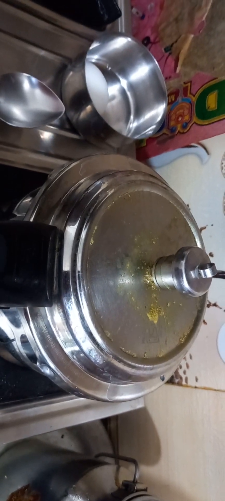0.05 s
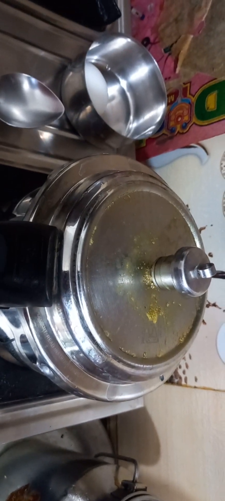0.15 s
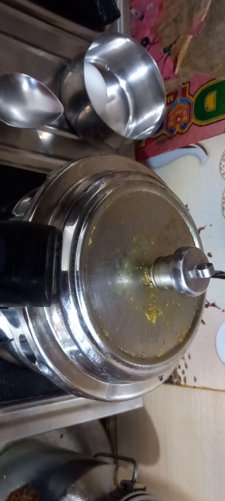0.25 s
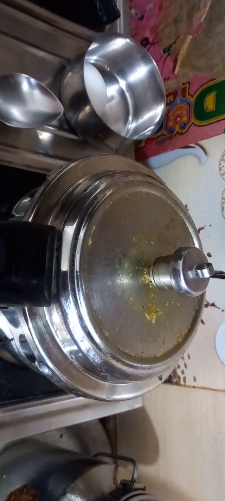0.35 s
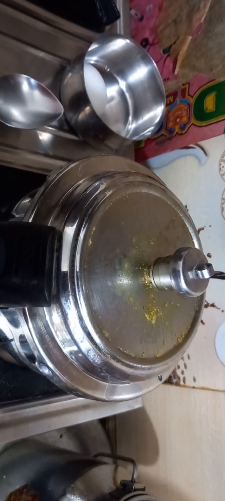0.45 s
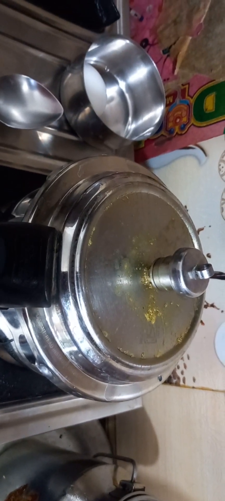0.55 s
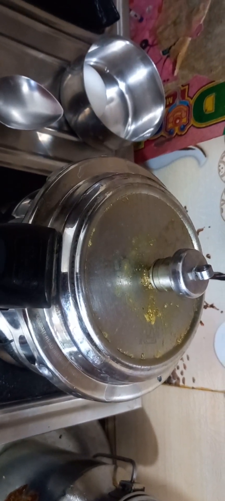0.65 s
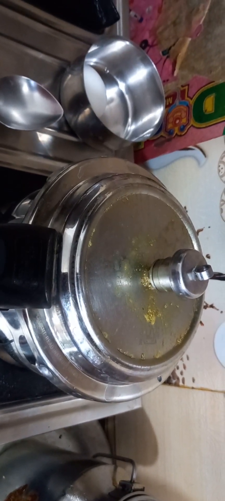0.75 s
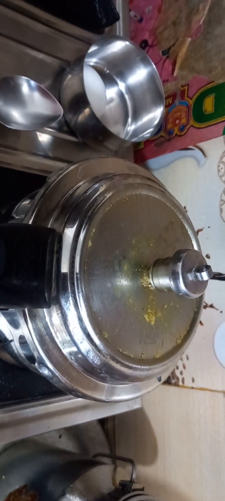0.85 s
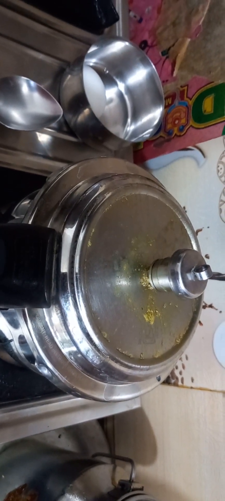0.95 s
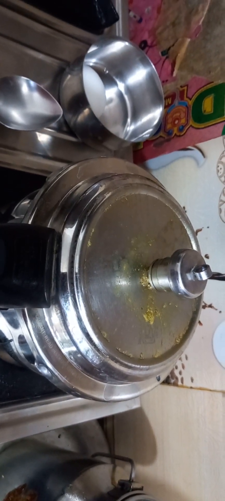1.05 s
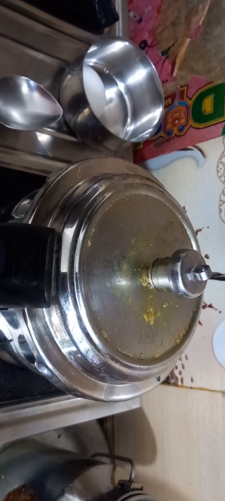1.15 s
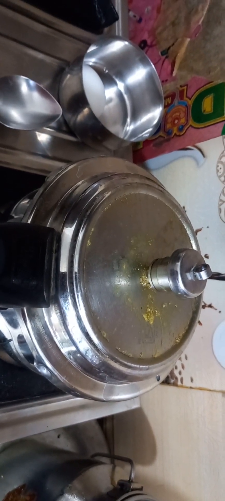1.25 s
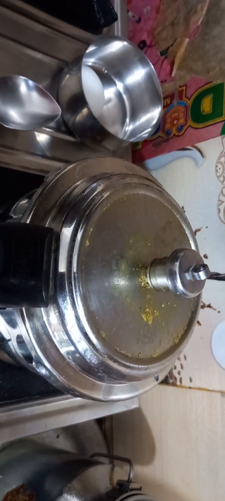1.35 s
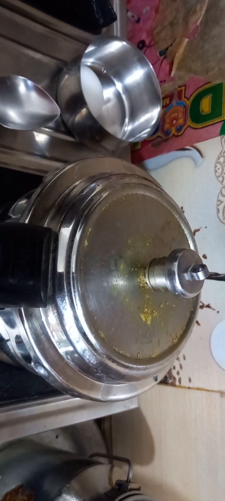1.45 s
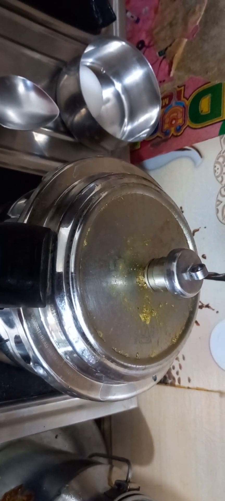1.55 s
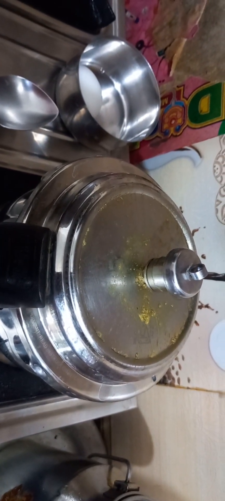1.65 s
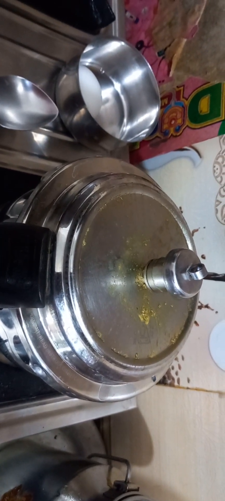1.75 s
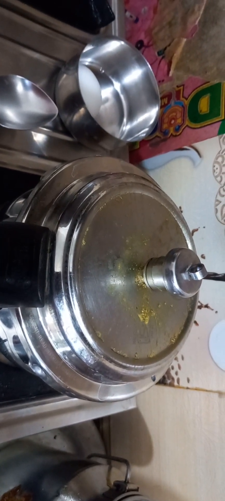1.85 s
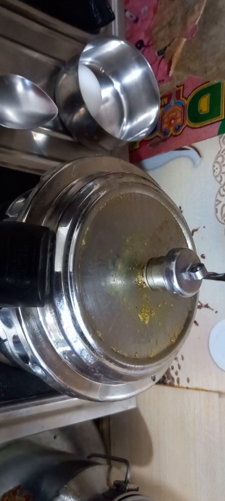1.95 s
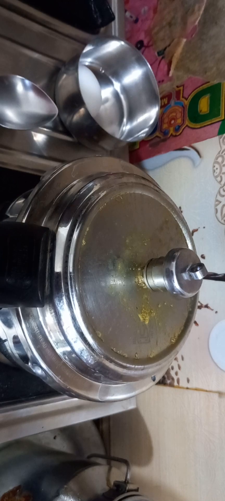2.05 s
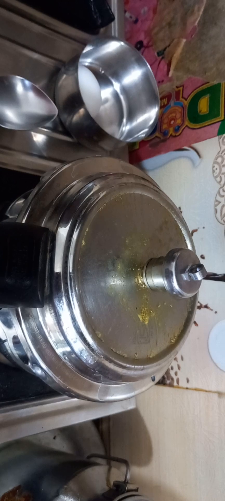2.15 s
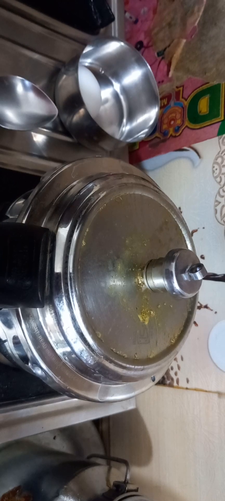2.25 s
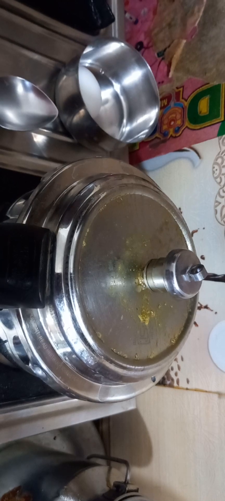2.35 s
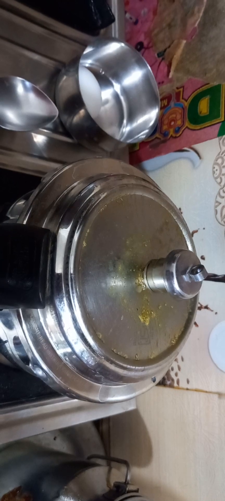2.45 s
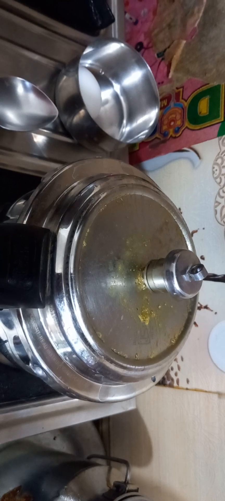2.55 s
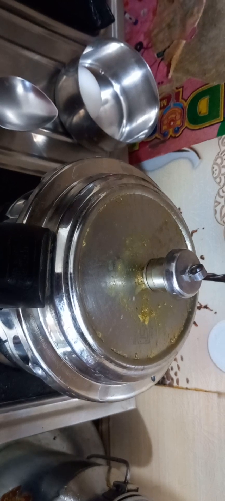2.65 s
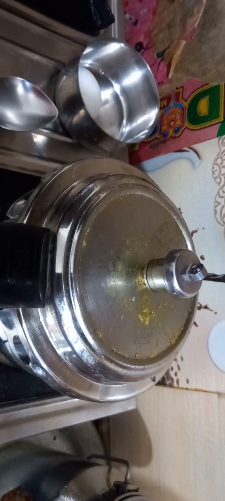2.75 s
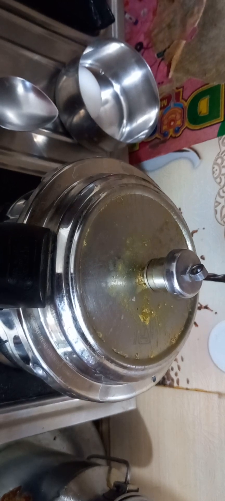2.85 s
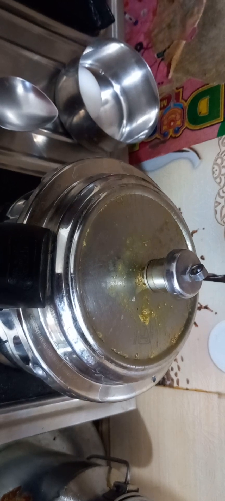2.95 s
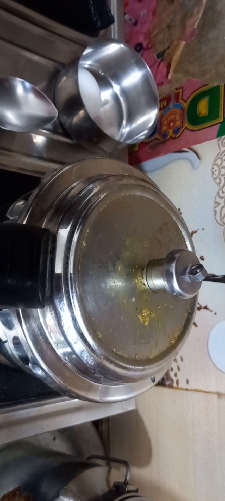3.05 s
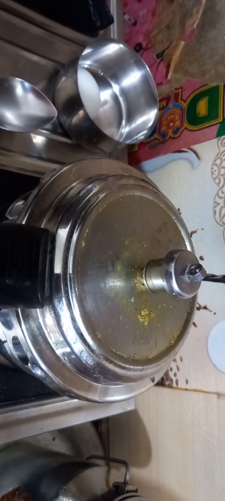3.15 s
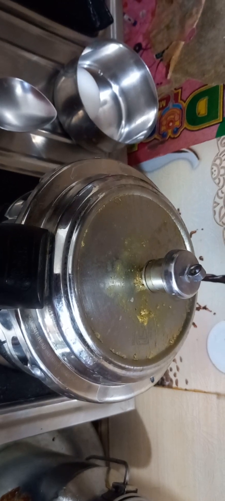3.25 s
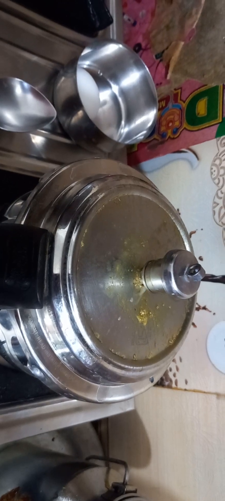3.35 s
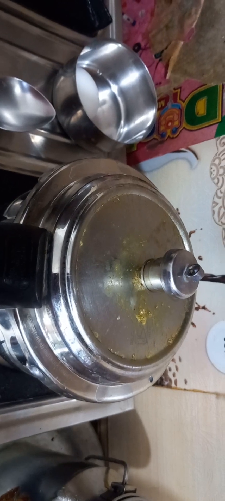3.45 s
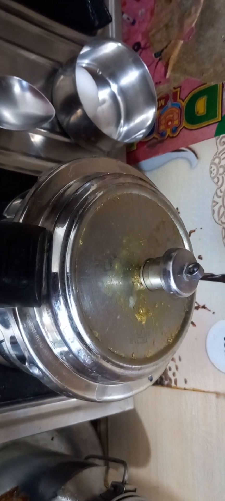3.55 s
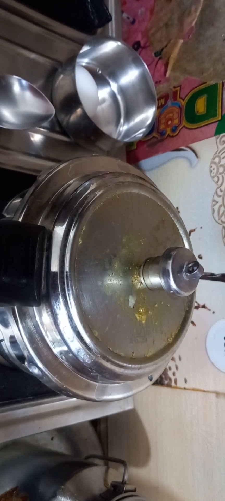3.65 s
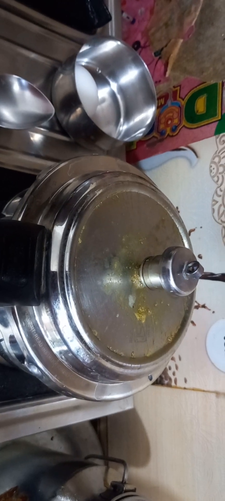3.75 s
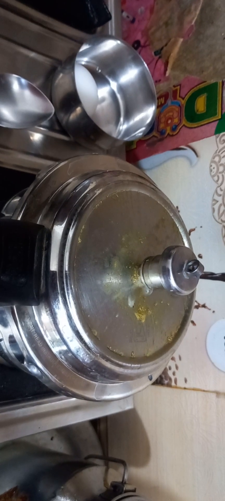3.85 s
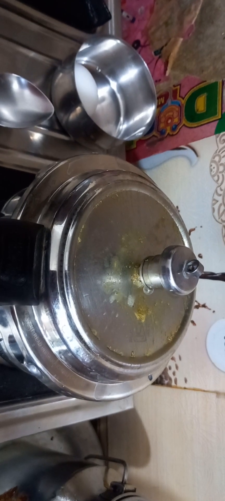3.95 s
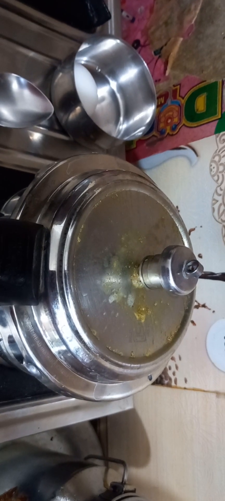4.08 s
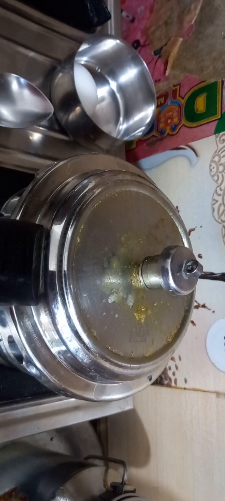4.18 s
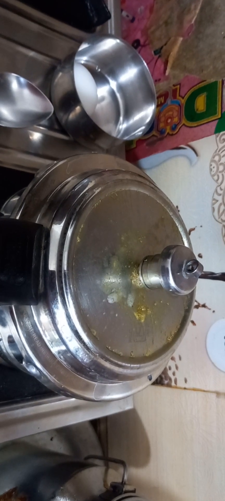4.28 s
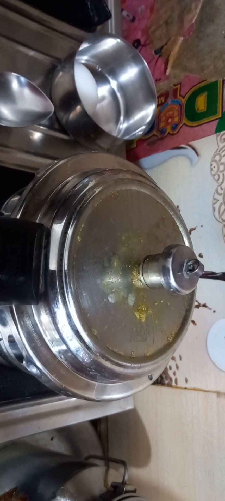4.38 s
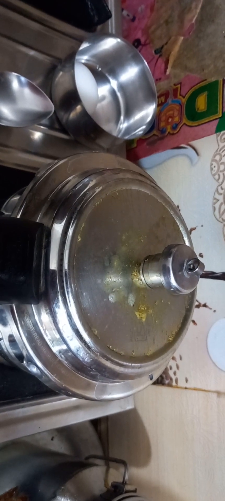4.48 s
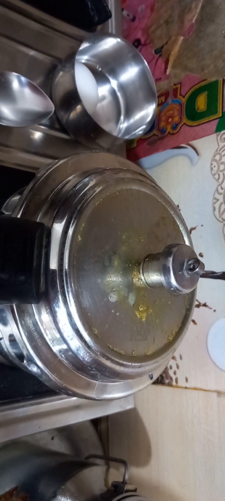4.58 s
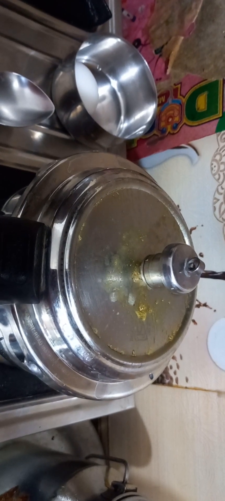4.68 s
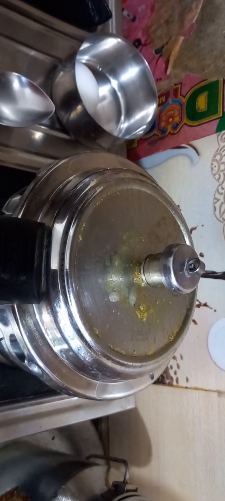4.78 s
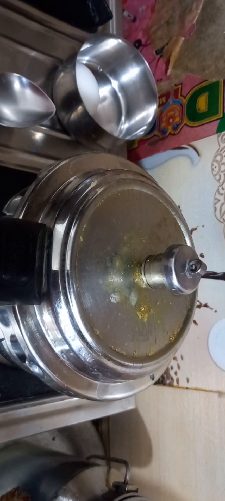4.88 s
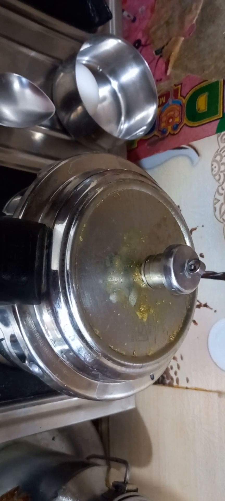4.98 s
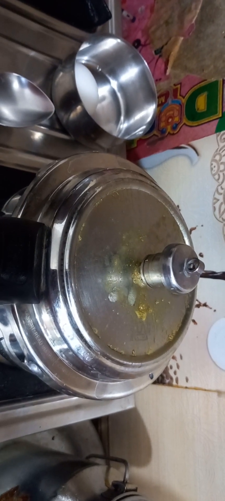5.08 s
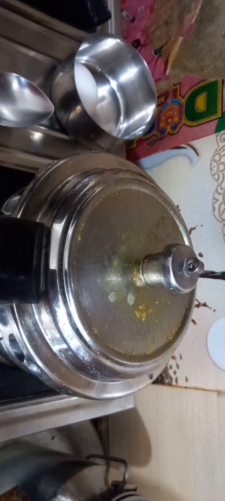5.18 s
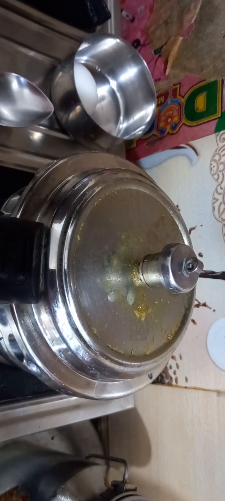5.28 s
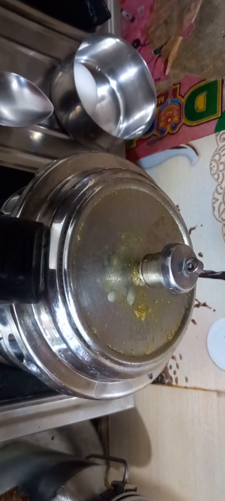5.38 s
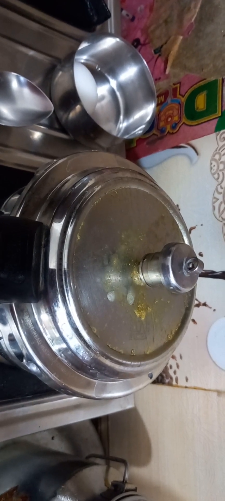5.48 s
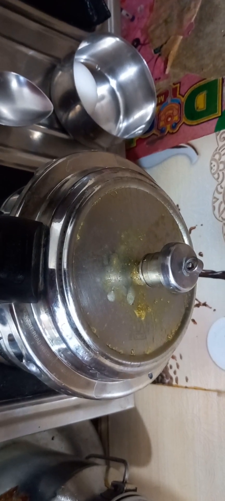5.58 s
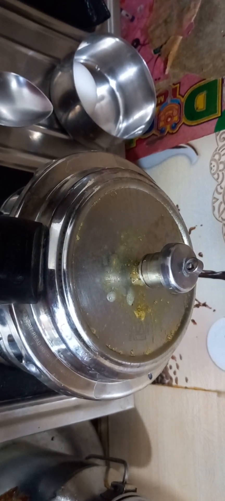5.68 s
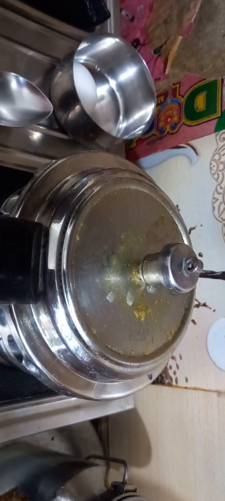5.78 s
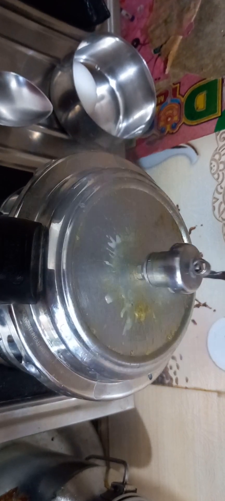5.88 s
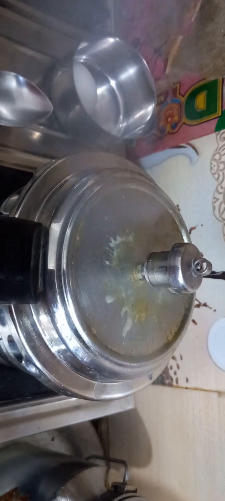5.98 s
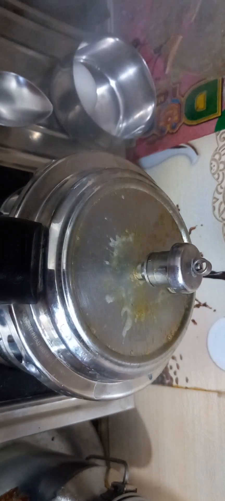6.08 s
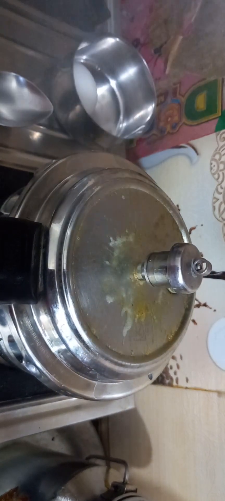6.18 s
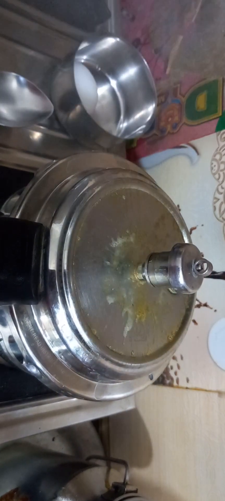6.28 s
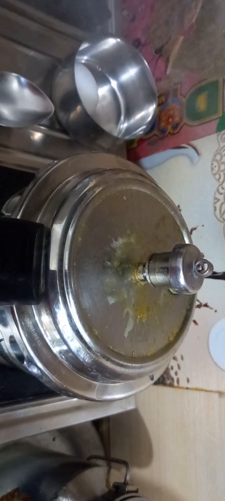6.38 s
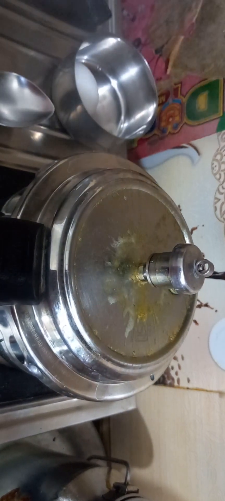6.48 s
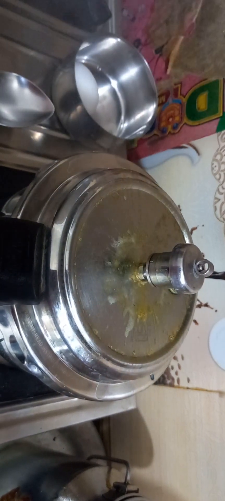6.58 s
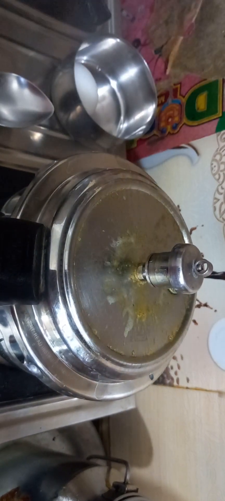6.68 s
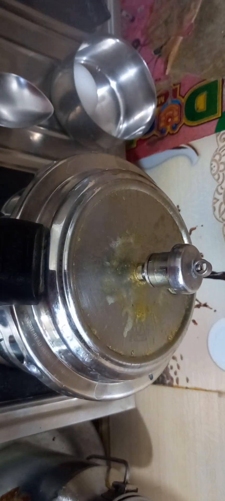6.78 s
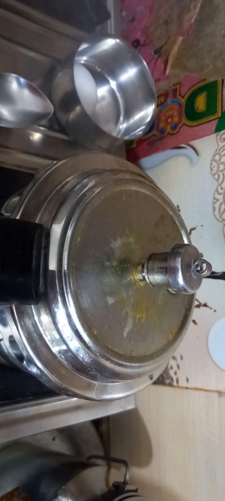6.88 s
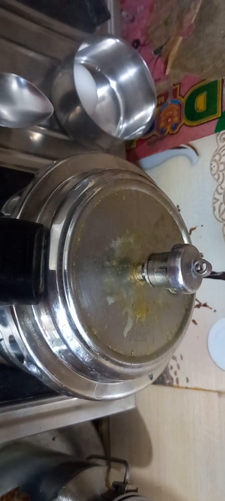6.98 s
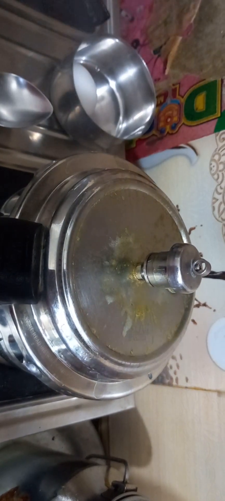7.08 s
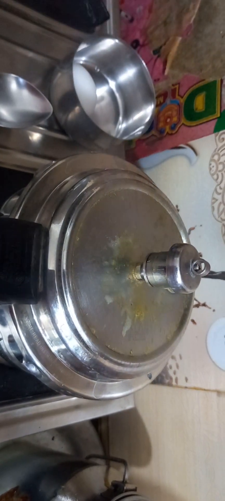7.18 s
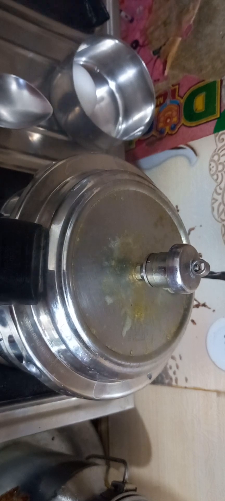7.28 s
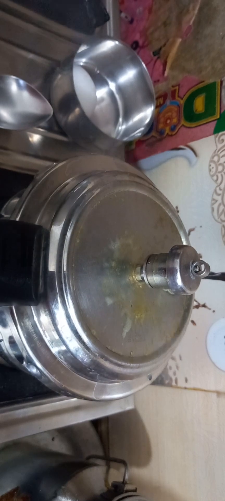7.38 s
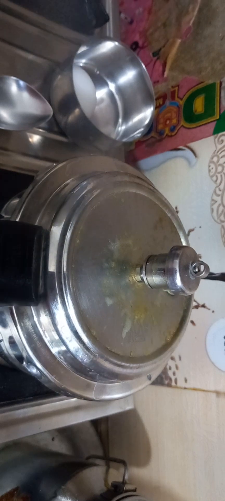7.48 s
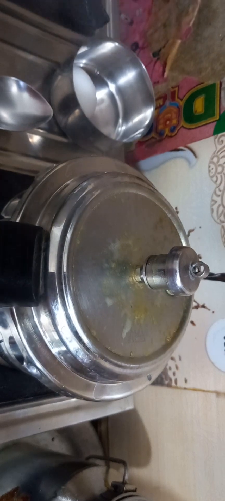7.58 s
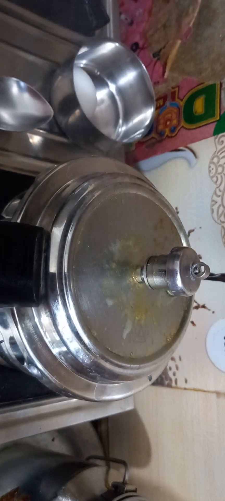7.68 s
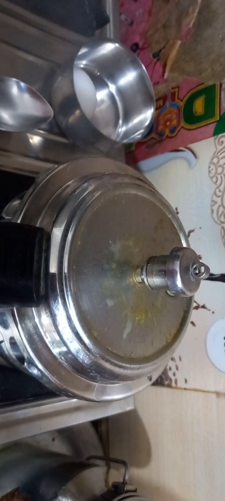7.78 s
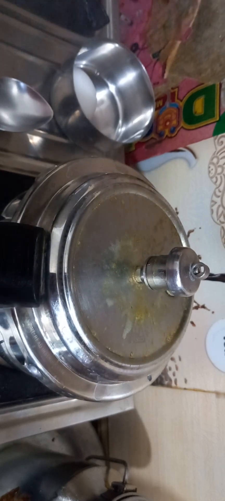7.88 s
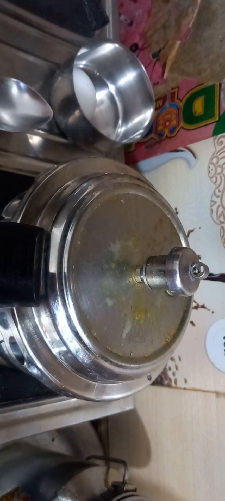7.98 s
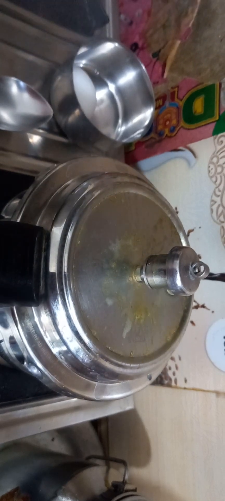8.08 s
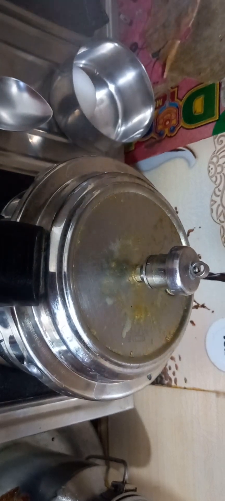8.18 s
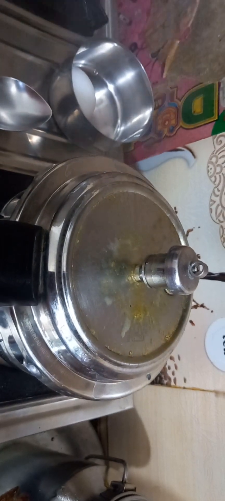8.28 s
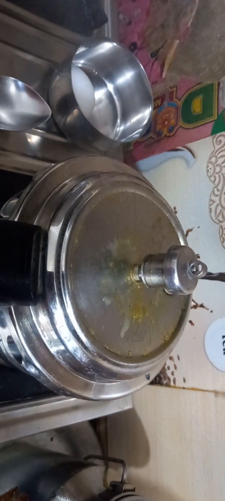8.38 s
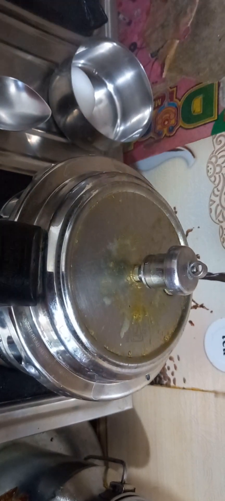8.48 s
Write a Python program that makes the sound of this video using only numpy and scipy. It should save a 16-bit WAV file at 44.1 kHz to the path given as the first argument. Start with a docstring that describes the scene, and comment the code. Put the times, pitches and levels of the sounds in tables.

```python
"""Quick spurts of steam hiss, then a long roaring blast, over a low flame drone, room murmur and faint far tones.
A small pressure cooker stands on a gas burner in a kitchen, close to a two-port microphone.
Its weight rocks and lets steam out in spurts, then lifts and frees the jet: filtered, patchy noise at each port.
The steel around it rings along as resonant noise; drone and murmur are filtered noise, the far tones are sines."""
import sys
import numpy as np
from scipy import signal
from scipy.fft import rfft, irfft, next_fast_len
from scipy.io import wavfile
from scipy.ndimage import uniform_filter1d, map_coordinates

SR = 44100
rng = np.random.default_rng(int(sys.argv[2]) if len(sys.argv) > 2 else 0)


def digitize_waveform(pressure):
    """Quantize a signal to 16-bit integers and store it at the path in sys.argv[1].

    Rows of a 2-D input are taken as channels; values are limited to [-1, 1].
    """
    field = np.atleast_2d(pressure).T
    bounded = np.clip(field, -1, 1)
    quanta = np.round(bounded * 32767).astype(np.int16)
    wavfile.write(sys.argv[1], SR, quanta)


N = 376173
LIFT_S = 5.925  # the weight is fully up

# Ringing lid and bowls: (frequency [Hz], width [Hz], relative level [dB])
STEEL_MODES = [(1551, 56, -1.5), (2082, 43, -1), (3520, 160, -9)]


def spurts():
    """The rocking weight opens the vent; the steel rings on after each spurt, and strong ones burst in a low puff."""
    # Leaking jet: (frequency [Hz], relative level per Hz [dB])
    leak_spectrum = [(250, -29), (500, -21.5), (1100, -22.5), (1700, -14.5), (2600, -16), (4300, -9.5),
                     (4900, -6.5), (6500, -1), (8500, -0.5), (9600, -0.5), (11200, -5.5), (13200, 0.5),
                     (14700, -5), (15700, -6)]
    flow_db = flow()
    closing_s = [LIFT_S - 0.045, LIFT_S + 0.038]
    leaking = np.interp(np.arange(N) / SR, closing_s, [1, 0])

    # More flow, brighter hiss: the part below 4600 Hz follows the flow less closely
    lower_db = -0.2 * (flow_db + 6.5)
    steam = ports(direct_share=0.3, near_share=0.25, patchy_db=1.5)
    jet = unit(filtered(steam, jet_colour(leak_spectrum, nozzle_db=0.1)))
    lower = filtered(jet, lambda hz: 1 / (1 + (hz / 4600) ** 8))
    hiss = amp(flow_db) * (jet - lower + amp(lower_db) * lower)

    # The ring follows the flow power and dies away with a 21 ms time constant
    fading = np.exp(-np.arange(SR // 2) / (0.021 * SR))
    lingering_power = signal.fftconvolve(amp(2 * flow_db), fading / fading.sum())[:N]
    lingering = np.sqrt(np.abs(lingering_power))
    struck = ports(direct_share=0.31, near_share=0.085, patchy_db=5.0)
    ring = unit(filtered(struck, steel_colour)) * panned(1.9)[:, None]

    # The puff gains 2.5 dB for each dB of flow, so only strong spurts show it
    puff = unit(filtered(eddies(channels=2, patchy_db=1.0), roar_colour))
    puff_db = 2.5 * (flow_db + 16.5) - 41.5
    puff_gain = np.hypot(amp(puff_db), jumps())
    return leaking * (hiss + amp(-22.5) * lingering * ring + puff_gain * puff)


def flow():
    """Hiss level in dB: every spurt swells and shuts by one shape, over the seep past the seated weight."""
    # Openings of the vent: (time of peak [s], peak level over the seep's power [dB], rise [s], fall [s])
    openings = [(0.428, -28.0, 0.13, 0.11), (0.744, -18.0, 0.41, 0.11), (0.875, -25.5, 0.13, 0.13),
                (1.067, -17.0, 0.16, 0.12), (1.778, -17.5, 0.29, 0.12), (1.893, -27.0, 0.1, 0.1),
                (2.093, -19.5, 0.21, 0.14), (2.301, -18.0, 0.18, 0.12), (2.449, -24.0, 0.14, 0.12),
                (2.626, -18.0, 0.16, 0.15), (2.782, -21.0, 0.12, 0.15), (2.913, -28.0, 0.09, 0.29),
                (3.173, -17.5, 0.27, 0.12), (3.395, -17, 0.24, 0.12), (3.502, -28.0, 0.11, 0.12),
                (3.689, -20, 0.17, 0.11), (3.89, -16, 0.21, 0.24), (4.097, -37, 0.12, 0.082),
                (4.214, -37.5, 0.09, 0.09), (4.508, -23.5, 0.12, 0.14), (4.73, -19, 0.2, 0.12),
                (4.83, -32, 0.12, 0.09), (4.963, -29.0, 0.1, 0.17), (5.227, -19, 0.29, 0.097),
                (5.368, -19.0, 0.14, 0.12), (5.544, -22.5, 0.18, 0.2), (5.817, -16.5, 0.21, 0.44)]
    # Steam seeping past the seated weight: (time [s], nominal level [dB])
    seep = [(0.0, -28.5), (0.5, -29), (0.95, -45), (1.18, -30.5), (1.33, -31.5), (1.6, -29.5), (1.95, -43),
            (4.15, -44), (4.45, -28.5), (4.6, -46), (5.9, -37)]
    pointed = 3.96  # power of the cosine that shapes rise and fall
    jump_hiss_db = 15  # hiss of a jump over its roar

    t = np.arange(N) / SR
    seep_db = curves(seep)[0] + 1.1 * wobble(9.9)
    power = amp(1.992 * seep_db)  # a factor of 2 would be exact power
    for s, db, rise, fall in openings:
        span = slice(round((s - rise) * SR), round((s + fall) * SR))
        from_peak = t[span] - s
        u = np.where(from_peak < 0, from_peak / rise, from_peak / fall)
        opening = np.abs(np.cos(np.pi / 2 * u)) ** pointed
        power[span] += (amp(db) * opening) ** 2
    jump_hiss = amp(jump_hiss_db) * jumps()
    return 10 * np.log10(power + jump_hiss ** 2)


def jumps():
    """Gain of the brief roars as the weight jumps clear for a moment: one bell curve each."""
    # Jumps: (time [s], roar level [dB])
    jump_times = [(1.795, -46), (3.905, -34.5)]
    width_s = 0.027
    t = np.arange(N) / SR
    return sum(amp(db) * np.exp(-((t - s) / width_s) ** 2) for s, db in jump_times)


def blast():
    """The lifted weight frees the jet: a wide hiss, and a lumpy roar that differs from port to port."""
    # Full jet: (frequency [Hz], relative level per Hz [dB])
    open_spectrum = [(1760, -15), (3000, -6), (5040, 0), (6340, -3), (7080, 1), (7750, 1.5), (11300, 3),
                     (13200, 2), (14400, 1.5), (15700, 0.5)]
    rise_s = 0.085  # time the weight takes to lift
    roar_start_db, roar_sag_db_per_s, roar_rise_db_per_s = -14.5, 0.89, 270
    hiss_start_db, hiss_sag_db_per_s = -17.8, 0.32
    surge_db, surge_s = 2.0, 0.27  # first rush of the hiss and its decay
    top_sag_db_per_s = 0.9  # the highest treble fades as the pressure falls
    # Left over right [dB] at lift and at the end: the plume drifts
    roar_pan_db, hiss_pan_db = (-2.5, 1.0), (-0.5, 1.5)

    since = np.arange(N) / SR - LIFT_S
    before, after = np.clip(since, None, 0), np.clip(since, 0, None)
    lifted = np.clip(1 + since / rise_s, 0, 1)
    roar_db = roar_start_db - roar_sag_db_per_s * after + roar_rise_db_per_s * before
    hiss_db = hiss_start_db - hiss_sag_db_per_s * after + surge_db * np.exp(-after / surge_s)
    drift = lambda pan_db: np.interp(after, [0, after[-1]], pan_db)

    lumps = amp(1.06 * np.array([wobble(40), wobble(40)]))
    roar = unit(lumps * filtered(eddies(channels=2, patchy_db=0.75), roar_colour))
    ring = unit(filtered(eddies(channels=2, patchy_db=2.5), steel_colour)) * panned(2.5)[:, None]

    steam = ports(direct_share=0.18, near_share=0.15, patchy_db=1.3)
    hiss = unit(filtered(steam, jet_colour(open_spectrum, nozzle_db=-3)))
    top = filtered(hiss, lambda hz: 1 / (1 + (12500 / (hz + 1)) ** 16))  # above 12.5 kHz
    hiss = hiss - top + amp(1.5 - top_sag_db_per_s * after) * top

    roar_side = panned(drift(roar_pan_db) + 1.6 * wobble(5))
    low = amp(roar_db) * roar_side * (roar + amp(-12.5) * ring)
    hiss_side = panned(drift(hiss_pan_db) + 0.5 * wobble(4))
    return lifted * (low + amp(hiss_db) * hiss_side * hiss)


def roar_colour(hz):
    """Low-heavy spectrum of the roar at each port, with its lean to one side and the dip at the right."""
    # Roar: (frequency [Hz], relative level per Hz [dB])
    roar_spectrum = [(15, -60), (25, -47), (72, -6), (104, 1), (171, -2.5), (253, -0.5), (316, 0),
                     (748, -8), (1350, -10), (1570, -7.5), (1860, -13.5), (2100, -10), (2380, -13.5),
                     (6380, -20.5), (9000, -21.5), (11700, -45), (19800, -120)]
    # Lean of the roar: (frequency [Hz], left over right [dB])
    roar_lean = [(60, 3.5), (150, -1.5), (380, 5), (950, 4), (2380, 5), (5980, 0), (15000, 17)]
    return amp(along(roar_spectrum, hz)) * panned(along(roar_lean, hz)) * shadowed(hz)


def jet_colour(spectrum, nozzle_db):
    """Spectrum at each port: jet, nozzle resonances, lean to one side and the dip at the right."""
    # Nozzle: (frequency [Hz], width [Hz], left over jet [dB], right over jet [dB]), before nozzle_db
    nozzle_modes = [(5374, 160, 4.5, 7), (5890, 80, 6.5, -1.5), (7280, 360, 3.5, 3), (8100, 110, 1.5, -4),
                    (8600, 91, 3, -8), (12600, 130, 2, -8), (15800, 150, -6, -5.5)]
    # Lean of the jet: (frequency [Hz], left over right [dB])
    jet_lean = [(60, -2.5), (92, -1.5), (140, 1.0), (210, 0.5), (330, -4), (500, 3), (770, 4), (1170, 2.5),
                (1790, -0.5), (2740, 1.5), (4190, 2), (6410, -3), (9810, -1), (15000, 2)]
    modes = [[(hz, width, db[port]) for hz, width, *db in nozzle_modes] for port in range(2)]

    def colour(hz):
        peaks = np.array([resonances(m, hz) for m in modes])
        nozzle = np.hypot(1, amp(nozzle_db) * peaks)
        return amp(along(spectrum, hz)) * nozzle * panned(along(jet_lean, hz)) * shadowed(hz)
    return colour


def steel_colour(hz):
    """Resonances of the lid and bowls."""
    return resonances(STEEL_MODES, hz)


def shadowed(hz):
    """Gains of left and right port, the right one with a dip in the treble."""
    # Dip: (centre [Hz], width [Hz], depth [dB])
    centre, width, dip_db = (8350, 750, -7)
    dip = dip_db * np.exp(-((hz - centre) / width) ** 2)
    return amp([0 * dip, dip])


def ports(direct_share, near_share, patchy_db):
    """One jet reaches the ports by short paths and the clutter of near steel; the room scatters the rest.
    Shares are of power."""
    # Paths off lid and tiles: (right after left [ms], relative level [dB], sign)
    echo_paths = [(.1, 0, 1), (.45, -5, 1), (1.63, -7, 1), (2.18, -7, -1), (-2.5, -9, 1)]
    jet, *scattered = eddies(channels=3, patchy_db=patchy_db)

    def paths(hz):
        return sum(sign * amp(db) * np.exp(-2j * np.pi * hz * ms / 1000) for ms, db, sign in echo_paths)
    direct = np.array([unit(jet), unit(filtered(jet, paths))])

    t = np.arange(SR // 10) / SR
    clutter = rng.standard_normal((2, len(t))) * amp(-60 * t / 0.09)  # falls 60 dB in 90 ms
    near = unit(signal.fftconvolve(jet[None], clutter, axes=1)[:, :N])

    far_share = np.clip(1 - direct_share - near_share, 0, 1)
    far = unit(np.array(scattered))
    return np.sqrt(direct_share) * direct + np.sqrt(near_share) * near + np.sqrt(far_share) * far


def eddies(channels, patchy_db):
    """Unrelated noises, each with small quick patches and wide slow drifts of random gain in time and frequency."""
    z = signal.stft(rng.standard_normal((channels, N)), nperseg=512)[2]

    def smoothed(bins, frames):
        rough = rng.standard_normal(z.shape)
        return unit(uniform_filter1d(uniform_filter1d(rough, size=bins, axis=1), size=frames, axis=2))
    patches = smoothed(bins=5, frames=8)
    drifts = smoothed(bins=24, frames=70)
    gain = amp(patchy_db * (patches + 0.49 * drifts))
    return signal.istft(z * gain, nperseg=512)[1][:, :N]


def burner():
    """The flame drones in a narrow low band, nearly the same at both ports."""
    # Flame: (frequency [Hz], width [Hz], relative level [dB]), before the gain is squared
    flame_modes = [(95, 6.8, 1.5), (119, 13.7, 0.5), (143, 12, -7.5), (200, 20, -4)]
    # Drone: (time [s], level before wobble and port mix [dB])
    drone_level = [(0.0, -46.5), (4.7, -47), (5.1, -41), (5.8, -38.5)]
    noise = rng.standard_normal((2, N))
    a, b = unit(filtered(noise, lambda hz: resonances(flame_modes, hz) ** 2))
    gain = amp(curves(drone_level)[0] + 0.8 * wobble(2.99))
    return gain * np.array([0.86 * a + 0.17 * b, 0.88 * a - 0.15 * b])


def kitchen():
    """Room murmur: filtered noise, most alike at both ports in the bass and low mids."""
    # Murmur: (frequency [Hz], relative level per Hz [dB])
    room_spectrum = [(18, -60), (30, -40), (60, -34), (85, -23), (170, -18.5), (330, -19), (420, -19.5),
                     (730, -24), (950, -25.5), (1540, -28), (5000, -26), (6500, -54), (11000, -120)]
    # Likeness of the ports: (frequency [Hz], left-right correlation)
    likeness = [(60, 0.63), (300, 0.89), (700, .5), (1500, 0), (4000, 0)]
    # Murmur: (time [s], level before wobble [dB])
    murmur_level = [(0.0, -44), (1.6, -48), (3.0, -46.5), (4.9, -52.5), (5.5, -47)]

    def mid_side(hz):
        turn = np.arccos(np.clip(along(likeness, hz), -1, 1)) / 2
        return amp(along(room_spectrum, hz)) * [np.cos(turn), np.sin(turn)]
    mid, side = filtered(eddies(channels=2, patchy_db=1), mid_side)
    gain = amp(curves(murmur_level)[0] + 1.1 * wobble(2.51))
    return gain * unit(np.array([mid + side, mid - side]))


def hums():
    """Short, soft sines from far off, slightly unsteady in pitch and level."""
    # Far tones: (start [s], length [s], frequency [Hz], peak level before flutter and pan [dB])
    far_tones = [(.14, .19, 350, -47), (.36, .1, 350, -44), (.68, .07, 1000, -52), (1.86, .32, 455, -52)]
    out = np.zeros(N + SR)
    flutter, drift = amp(3.5 * wobble(25)), wobble(30)
    for s, length, hz, db in far_tones:
        t = np.arange(int(length * SR)) / SR
        start = round(s * SR)
        phase = 2 * np.pi * hz * t + 0.7 * drift[start:][:len(t)]
        swell = np.sin(np.pi * t / length)
        out[start:][:len(t)] += amp(db) * swell * np.sin(phase)
    return out[:N] * flutter * panned(3.4)[:, None]


def amp(db):
    """Gain of a level in dB."""
    return 10 ** (np.asarray(db) / 20)


def unit(x):
    """x at an RMS of one."""
    return x / np.sqrt(np.mean(x ** 2) + 1e-20)


def panned(db):
    """Left and right gains that differ by db."""
    return amp(np.array([db / 2, -db / 2]))


def along(points, hz):
    """(frequency [Hz], value) points joined on a log axis."""
    f, v = np.transpose(points)
    return np.interp(np.log(hz + 1), np.log(f + 1), v)


def curves(rows):
    """One value per sample for each column after the time."""
    s, *cols = np.transpose(rows)
    return [np.interp(np.arange(N) / SR, s, c) for c in cols]


def wobble(rate):
    """A smooth random curve, rate knots a second."""
    knots = rng.standard_normal(int(N * rate / SR) + 4)
    return map_coordinates(knots, [np.arange(N) * rate / SR])


def filtered(x, response):
    """x through a real or complex response of frequency."""
    m = next_fast_len(N + SR // 2)
    return irfft(rfft(x, m) * response(np.fft.rfftfreq(m, 1 / SR)), m)[..., :N]


def resonances(modes, f):
    """Gain of (frequency [Hz], width [Hz], level [dB]) resonances, added in power."""
    power = 0
    for c, w, db in modes:
        power = power + amp(db) ** 2 * (f * w) ** 2 / ((c * c - f * f) ** 2 + (f * w) ** 2)
    return np.sqrt(power)


def scene():
    """Cooker, burner and kitchen together."""
    return spurts() + blast() + burner() + kitchen() + hums()


def record(dry):
    """Peaks saturate softly below 0.98; nothing passes above the band limit."""
    top_hz = 15740
    soft = dry / (1 + np.abs(dry / 0.98) ** 6) ** (1 / 6)
    return filtered(soft, lambda hz: hz < top_hz)


dry = scene()
out = record(dry)
digitize_waveform(out)
```